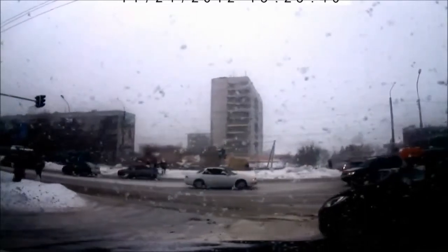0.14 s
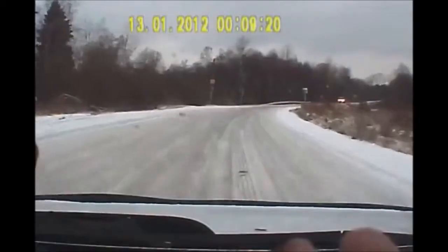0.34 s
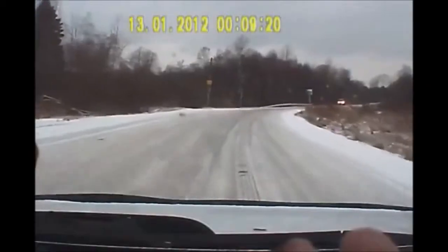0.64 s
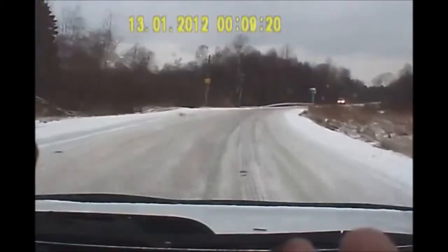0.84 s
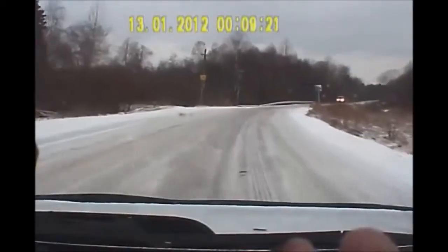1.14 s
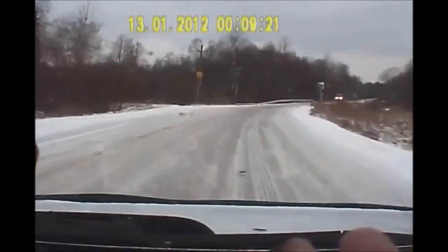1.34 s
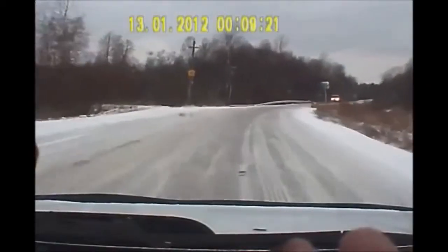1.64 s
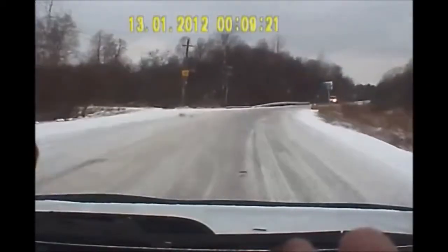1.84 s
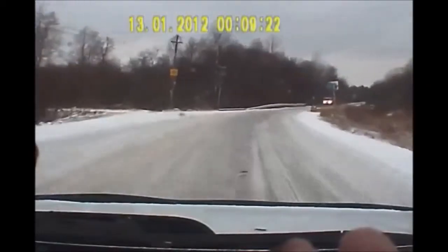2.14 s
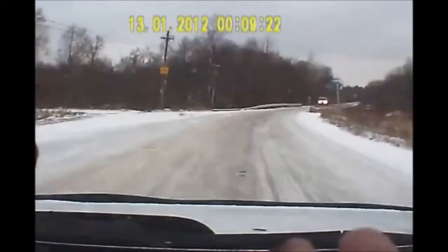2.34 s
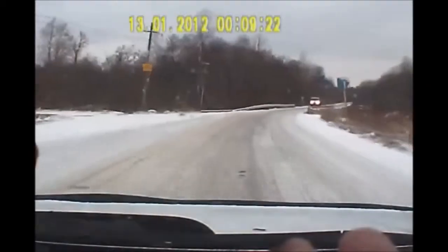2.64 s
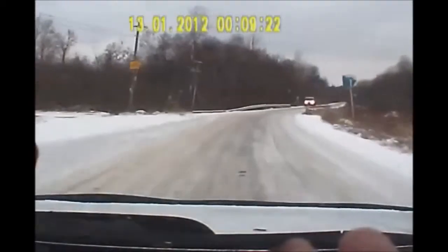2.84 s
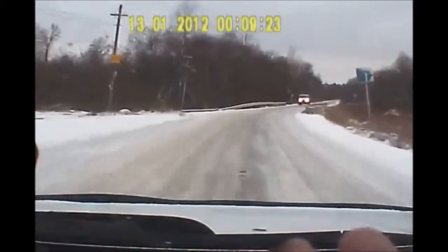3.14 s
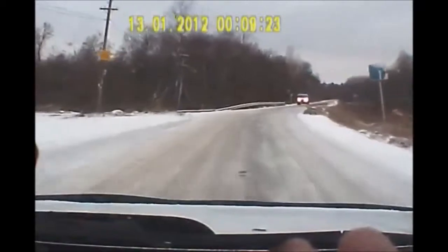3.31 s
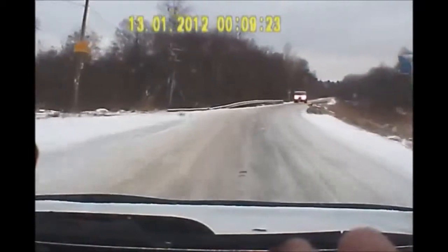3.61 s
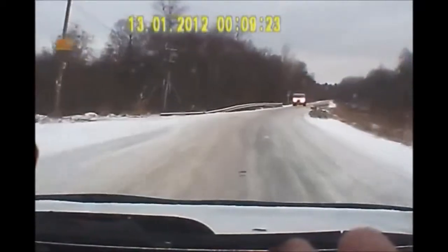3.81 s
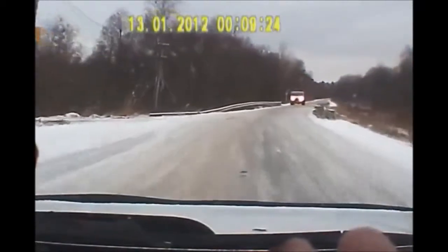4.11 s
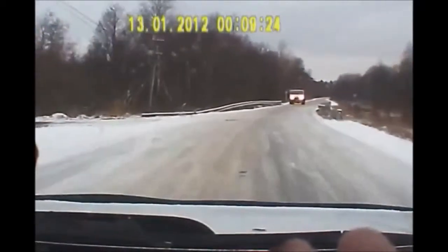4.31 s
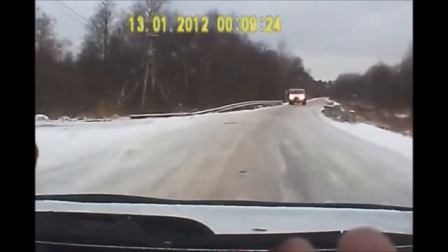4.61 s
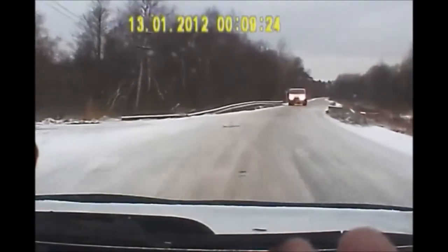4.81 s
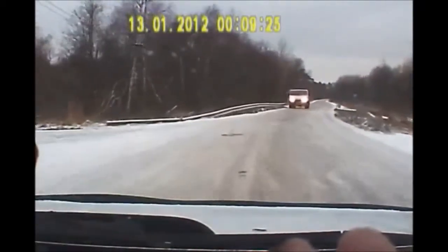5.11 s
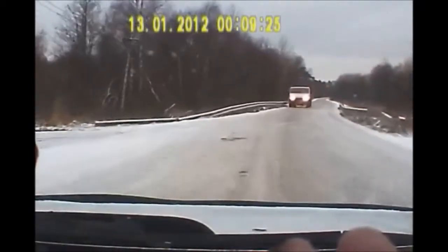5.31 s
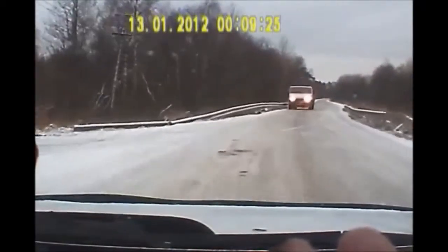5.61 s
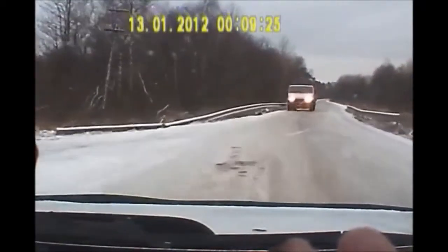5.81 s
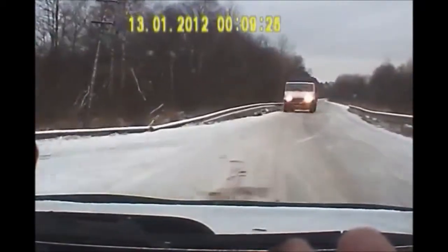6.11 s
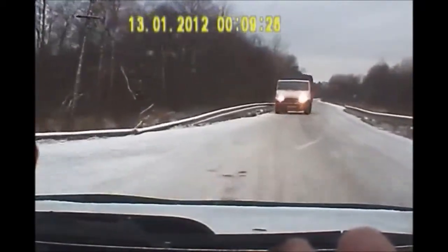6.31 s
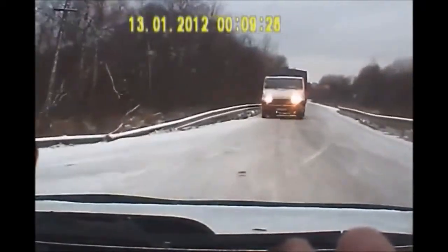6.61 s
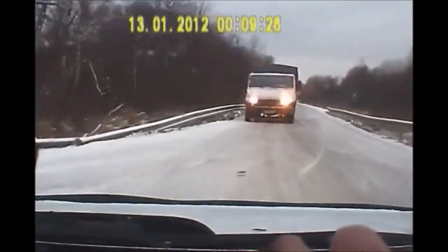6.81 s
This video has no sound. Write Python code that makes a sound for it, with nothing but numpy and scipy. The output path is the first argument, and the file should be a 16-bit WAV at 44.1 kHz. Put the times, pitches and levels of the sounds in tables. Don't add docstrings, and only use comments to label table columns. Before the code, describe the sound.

A cheap dashboard microphone in a closed cabin. First a short, muffled idle rumble with deep wobbles, then an abrupt change to a hissier drive over snow. Low tyre roar and body rumble stay fairly even, with plastic ticks early on. Rutted ice then brings a sudden rougher, louder roar, juddering panels, rattling mount, crunching slush and heavy low bumps. The roar later drops, but sharp snaps and a hard panel thump follow.

```python
import sys
import numpy as np
from scipy import signal
from scipy.fft import rfft, irfft
from scipy.io import wavfile

SR = 44100
rng = np.random.default_rng(int(sys.argv[2]) if len(sys.argv) > 2 else 0)


def dump(signal):
    limited = np.clip(np.atleast_2d(signal).T, -1, 1)
    pcm = np.round(limited * 32767).astype(np.int16)
    wavfile.write(sys.argv[1], SR, pcm)


def gain_from_decibels(decibels):
    exponent = np.asarray(decibels, float) / 20
    return 10 ** exponent


N = 306495
CUT_S = 0.38150

# f/Hz, level per Hz/dB
TOWN_COLOUR = [(120, -42), (200, -1.5), (284, 0.5), (508, -14.5), (822, -14), (1680, -34), (2210, -33),
               (2410, -30), (3090, -40.5), (6500, -50), (8450, -76), (14300, -120)]
# f/Hz, level per Hz/dB
IDLE_COLOUR = [(50, -24), (65, -1), (90, -1), (140, -4), (200, -15), (240, -36)]
# f/Hz, level/dB
TOWN_WHINE = [(7870, -69)]
# t/s, level/dB, f/Hz, half length/s
TOWN_LURCHES = [
    (0.02, -27.5, 85.5, 0.021),
    (0.115, -25, 95, 0.0075),
    (0.122, -56, 1700, .002),
    (0.15, -20.5, 50.4, 0.011),
    (0.186, -27, 40.3, 0.018),
    (0.358, -29.5, 51, 0.023),
    (0.375, -27, 40, 0.0051),
]
TOWN_CABIN_DB, TOWN_HEAVE_DB, TOWN_IDLE_DB, TOWN_HISS_DB = -41, -31.5, -30, -66
IDLE_FADE_DB_PER_S = 43

# f/Hz, level per Hz/dB
HISS_COLOUR = [(1410, -24), (2400, -12), (3060, -5), (3600, 0), (4280, -2), (5930, -1.5), (6520, 0),
               (8050, -4.5), (8240, -2.5), (9330, -2), (12500, -11), (13900, -28), (15500, -54)]
# f/Hz, level/dB, time to fall 60 dB/s
MIC_RESONANCE = (9230, -62, 0.017)
# f/Hz, level/dB
MIC_WHINE = [(8441, -64), (12000, -80)]
HISS_DB, MIC_TOP_HZ = -52.5, 12500
OFFSET, RAIL = -0.62, -0.99

# t/s, roar level/dB
ROAD = [(0.45, -31), (2.05, -33), (3.12, -33.5), (3.33, -33), (3.37, -27.5), (3.56, -27), (3.79, -29),
        (3.99, -25), (4.51, -23), (4.77, -25), (5.55, -24), (5.87, -25), (6.21, -30.5), (6.92, -33)]
# t/s, share of ice/0-1
ROUGHNESS = [
    (0.4, 0.03),
    (3.2, 0.01),
    (3.34, 0.55),
    (3.362, 1),
    (5.8, 0.38),
    (6.3, 0.54),
    (6.95, 0.56),
]
ROAD_MEAN_DB = -30
HEAVE_FOLLOWS, BODY_FOLLOWS, BOOM_FOLLOWS, HUM_FOLLOWS, RUSTLE_FOLLOWS = 0.13, 0.29, 0.04, -0.21, 0.5

# f/Hz, level per Hz/dB
HEAVE_COLOUR = [(14, -32), (24, 1.5), (36, -1), (44, -1), (53, 1), (62, -10), (70, -47)]
# f/Hz, level per Hz/dB
BODY_COLOUR = [(55, -6), (66, -3), (76, 3.5), (100, -3), (120, -4), (142, -4), (160, -14.5), (200, -6.5),
               (240, -28)]
# f/Hz, width/Hz, level/dB
BOOM_MODES = [(258.2, 36, -3), (301.6, 40.8, 2), (367, 40, -2.5), (437.3, 45, -4.5)]
# f/Hz, width/Hz, level/dB
ENGINE_HUM = [(138.7, 15.4, 0)]
# t/s, level/dB, f/Hz, half length/s
RUTS = [(0.6, -25, 41, 0.023), (0.74, -23, 43, 0.036), (1.09, -25, 46.3, 0.022), (1.42, -24, 45, 0.033),
        (2.19, -31, 43, .03), (2.65, -28, 39, .03), (3.68, -21, 43, 0.027), (3.78, -19, 40, 0.024),
        (3.87, -26, 45, .03), (4.08, -19.5, 34.8, .03), (4.2, -37, 42, .03), (4.49, -15.5, 43, 0.021),
        (4.58, -15.5, 35.8, 0.028), (4.9, -26, 45, .03), (5.31, -19.5, 45, 0.035), (5.7, -20.5, 45, 0.026),
        (5.79, -17.5, 42.2, 0.022), (6.05, -15.5, 40.8, 0.027), (6.22, -19.5, 38.3, 0.06),
        (6.45, -24, 37, 0.037), (6.62, -17.5, 38.8, 0.039), (6.93, -21, 43.8, 0.027)]
# t/s, level/dB, half length/s
WASHBOARD = [(0.492, -36.5, 0.043), (3.886, -42.5, 0.13), (4.107, -34, 0.037), (4.37, -27, 0.025),
             (4.57, -28, 0.028), (5.017, -40, 0.19), (5.215, -34, 0.018), (5.437, -31, 0.12),
             (5.735, -35, .04), (5.996, -30, 0.021), (6.238, -31.5, 0.038), (6.78, -30, 0.024)]
# t/s, level/dB, f/Hz, half length/s
SHUDDERS = [
    (6.654, -19, 1900, 0.0013),
    (6.745, -27.5, 400, .01),
    (6.76, -23.5, 229, .012),
    (6.79, -19.5, 340, .012),
    (6.867, -18, 693, 0.0021),
]
# t/s, level/dB, f/Hz, half length/s
JOLTS = [
    (3.363, -26, 90, 0.022),
    (3.94, -27, 107, .02),
    (5.67, -27, 98, .02),
    (5.999, -24, 92, 0.022),
    (6.149, -28, 96, .03),
    (6.34, -25, 85, 0.023),
    (6.509, -27.5, 87, 0.018),
    (6.74, -25, 84, 0.018),
    (6.812, -22.5, 79, 0.027),
]
HEAVE_DB, BODY_DB, BOOM_DB, HUM_DB = -27, -32, -28.5, -38

# f/Hz, level per Hz/dB
RATTLE_COLOUR = [(1900, -11), (2300, -13.5), (2930, -9.5), (3400, -2), (3640, -0.5), (3900, -5),
                 (4400, -9.5), (4900, -12), (5600, -45)]
# f/Hz, level per Hz/dB
CRUNCH_COLOUR = [(4200, -30), (4900, -7.5), (5900, 2), (6700, -7), (7600, -36)]
# f/Hz, level per Hz/dB
SPRAY_COLOUR = [(5200, -22), (6500, -2.5), (8700, 2), (10700, -1.5), (13000, -13), (14500, -29)]
# f/Hz, level/dB, time to fall 60 dB/s
MOUNT_TONES = [(3500, -7, 0.0086), (3647, 14, 0.037), (3610, 5, 0.014), (4800, -2, .01),
               (5700, -29, 0.0085)]
# t/s, rattle level/dB, half length/s, slush over rattle/dB
BURSTS = [(4.003, -62, 0.05, -7), (4.095, -35, .01, -14), (4.155, -55, 0.061, -11), (4.342, -49, 0.021, -3),
          (4.566, -44, 0.028, -25), (5.103, -45.5, .05, -9), (5.162, -39.5, 0.016, -18),
          (5.243, -43, .03, 3.5), (5.335, -46, 0.03, -11), (5.415, -52, .03, 0), (5.55, -50, .12, -9),
          (5.846, -51.5, 0.052, -5), (5.998, -33.5, 0.011, -5), (6.04, -42.5, 0.028, -8),
          (6.23, -48.5, 0.055, -5), (6.42, -41, .03, -7), (6.637, -35, 0.018, -1), (6.712, -44, .03, 2.5),
          (6.87, -45.5, 0.02, -6)]
RATTLE_DB, CRUNCH_DB, SPRAY_DB = -53.5, -66, -64.5
SPRAY_UNDER_CRUNCH_DB = 3.5

# f/Hz, level/dB, time to fall 60 dB/s
TRIM_TONES = [(4280, 17, 0.018), (3540, 8, 0.053)]
# lowest f/Hz, highest f/Hz
TICK_BANDS = [(1100, 1825), (5500, 9500)]
# t/s, peak level/dB, low knock/dB, bright edge/dB, ring/dB
SNOW_TICKS = [(0.482, -40, -9, -15, -9), (0.516, -38, -9, -15, -9), (0.5266, -26.5, 2, -15, 4.5),
              (0.6789, -46, 0, -11, -9), (0.745, -38, 7, -8, -9), (0.7952, -30.5, 9, -22, 5),
              (0.94, -37, 0, -13, -9), (1.0216, -24.5, 0, -25, -3), (1.1325, -22.5, 0.5, -26, -12),
              (1.183, -29, 5, -11, -5), (1.2046, -19.5, 4.5, 1, -2), (1.451, -37, 2, -15, -12),
              (1.477, -38, 3, -12, -11)]
# t/s, peak level/dB, low knock/dB, bright edge/dB
ICE_TICKS = [(3.3525, -40, 1, -14), (3.3732, -22, -2, -15), (3.8226, -32, 7, -20), (3.96, -20.5, -4, -23),
             (3.9842, -20, 0, -15), (4.013, -19.5, 3, -8), (4.033, -28, 9, -12), (4.06, -21.5, 1, -1.5),
             (4.0823, -15.5, -5, -38), (4.106, -26.5, -4, 7.5), (4.1112, -15.5, -1, -19),
             (4.1585, -20.5, -14, -8), (4.231, -25, 1, -17), (4.4725, -28, -1, -19),
             (4.5537, -19, 1.5, -15), (4.812, -28.5, 3, -20), (4.887, -32, -3, -17), (5.1519, -31, 6, -23),
             (5.3305, -31, 10, 0), (5.9882, -18, -10, -9), (6.0242, -24, 7, -8), (6.2425, -33, 9.5, -16),
             (6.399, -34, -7, -18), (6.6144, -32, -13, -16), (6.651, -14.5, 4, -10), (6.7696, -28, -3, -18),
             (6.863, -21, 1.5, -21)]
# t/s, peak level/dB, low knock/dB, bright edge/dB
SNAPS = [
    (4.3182, -28, -6, -19),
    (5.983, -24, -1, -15),
    (6.0796, -36, -9, -18),
    (6.5922, -13.5, -17, -37),
    (6.633, -27, -2, -16),
]
# t/s, peak level/dB, f/Hz, time to fall 60 dB/s
THUMPS = [
    (1.204, -32, 1700, 0.014),
    (6.021, -16, 520, .03),
    (6.023, -28.5, 9200, 0.066),
    (6.654, -12, 880, 0.029),
]
TICK_HZ, SNAP_HZ, ICE_RING_DB = 3840, 4960, -20

# f/Hz, level per Hz/dB
SNOW_ROAR_COLOUR = [(280, 4), (480, -10.5), (536, -5), (590, 0), (747, -1.5), (799, -0.5), (1260, -10),
                    (1850, -25.5), (2800, -32.5), (3640, -32), (6160, -120)]
# f/Hz, level per Hz/dB
ICE_ROAR_COLOUR = [(280, 2.5), (480, -12), (669, -12), (731, -2.5), (989, -1), (1260, -2.5), (1450, -9),
                   (1730, -14), (2800, -27.5), (3640, -37), (6160, -120)]
# f/Hz, width/Hz, level/dB
FLOOR_PANELS = [(659.6, 61, -11.5), (888.4, 42, -1), (995.4, 23, 2.5), (1108, 66, 2), (1254, 17, -4.5),
                (1534, 62, -16), (1711, 33, -9.5)]
# f/Hz, level per Hz/dB
SCRUB_COLOUR = [(1200, -17), (1700, 2), (2300, -5), (3000, -20)]
SCRUB_S, SCRUB_DB, SCRUB_HALF_S = 3.55, -43, 0.076


def seconds():
    return np.arange(N) / SR


def rms_one(x):
    return x / np.sqrt(np.mean(x ** 2) + 1e-20)


def peak_one(x):
    return x / np.abs(x).max()


def in_time(rows):
    s, *columns = np.transpose(rows)
    return [np.interp(seconds(), s, column) for column in columns]


def drift(rate):
    r = np.exp(-80 * np.pi * rate / SR)
    noise = rng.standard_normal(N // 40 + 2002)
    slow = signal.lfilter([1], [1, -2 * r, r * r], noise)[2000:]
    return np.interp(np.arange(N) / 40, np.arange(len(slow)), np.clip(rms_one(slow), -2, 2))


def coloured(colour):
    hz, db = np.transpose(colour)
    f = np.maximum(np.arange(N // 2 + 1) * SR / N, 1)
    shape = gain_from_decibels(np.interp(np.log(f), np.log(hz), db, left=-120, right=-120))
    return rms_one(irfft(rfft(rng.standard_normal(N)) * shape, N))


def ring(drive, hz, t60):
    r = gain_from_decibels(-60 / (max(t60, 0.002) * SR))
    w = 2 * np.pi * hz / SR
    return signal.lfilter([0, np.sin(w)], [1, -2 * r * np.cos(w), r * r], drive + 1e-18)


def resonant(modes, flicker_db):
    out = 0
    for hz, width, db in modes:
        t60 = np.log(1000) / (np.pi * 1.5 * width)
        once = ring(rng.standard_normal(N), hz, t60)
        out = out + gain_from_decibels(db + flicker_db * drift(7.6)) * rms_one(ring(once, hz, t60))
    return rms_one(out)


def swell(s, half_s):
    return np.exp(-0.5 * ((seconds() - s) / half_s) ** 2)


def rocking(rows):
    out = 0
    for s, db, hz, half_s in rows:
        swing = np.sin(2 * np.pi * hz * (seconds() - s))
        out = out + np.sqrt(2) * gain_from_decibels(db) * swell(s, half_s) * swing
    return out


def whine(lines):
    return sum(np.sqrt(2) * gain_from_decibels(db) * np.sin(2 * np.pi * hz * seconds()) for hz, db in lines)


def town():
    idle_db = TOWN_IDLE_DB - IDLE_FADE_DB_PER_S * np.minimum(seconds(), CUT_S)
    air = gain_from_decibels(TOWN_CABIN_DB) * coloured(TOWN_COLOUR)
    heave = gain_from_decibels(TOWN_HEAVE_DB) * coloured(HEAVE_COLOUR)
    engine = gain_from_decibels(idle_db) * coloured(IDLE_COLOUR)
    hiss = gain_from_decibels(TOWN_HISS_DB) * rng.standard_normal(N)
    return air + heave + engine + rocking(TOWN_LURCHES) + whine(TOWN_WHINE) + hiss


def microphone_noise():
    hz, db, t60 = MIC_RESONANCE
    peak = gain_from_decibels(db) * rms_one(ring(rng.standard_normal(N), hz, t60))
    return gain_from_decibels(HISS_DB) * coloured(HISS_COLOUR) + peak + whine(MIC_WHINE)


def cabin(swing_db):
    heave = gain_from_decibels(HEAVE_DB + HEAVE_FOLLOWS * swing_db) * coloured(HEAVE_COLOUR)
    body = gain_from_decibels(BODY_DB + BODY_FOLLOWS * swing_db) * coloured(BODY_COLOUR)
    washboard = sum(gain_from_decibels(db) * swell(s, half_s) for s, db, half_s in WASHBOARD)
    boom_height = gain_from_decibels(BOOM_DB + BOOM_FOLLOWS * swing_db) + washboard
    boom = boom_height * resonant(BOOM_MODES, flicker_db=2.0)
    hum = gain_from_decibels(HUM_DB + HUM_FOLLOWS * swing_db) * resonant(ENGINE_HUM, flicker_db=3.5)
    return heave + rocking(RUTS) + rocking(SHUDDERS + JOLTS) + hum + body + boom


def mount_rattle(ice):
    sizes = gain_from_decibels(5.3 * np.minimum(rng.exponential(1, N), 4)) * rng.choice([-1, 1], N)
    knocks_per_s = (30 + 500 * ice) * gain_from_decibels(5 * drift(6))
    clicks = sizes * (rng.random(N) < knocks_per_s / SR)
    return rms_one(sum(gain_from_decibels(db) * ring(clicks, hz, t60) for hz, db, t60 in MOUNT_TONES))


def rustle(ice, swing_db):
    bed = gain_from_decibels(RUSTLE_FOLLOWS * swing_db)
    chatter = sum(gain_from_decibels(db) * swell(s, half_s) for s, db, half_s, _ in BURSTS)
    splash = sum(gain_from_decibels(db + slush_db) * swell(s, half_s) for s, db, half_s, slush_db in BURSTS)
    rattle = (gain_from_decibels(RATTLE_DB) * bed + chatter) * (coloured(RATTLE_COLOUR) + 0.25 * mount_rattle(ice))
    crunch = (gain_from_decibels(CRUNCH_DB) * bed + splash) * coloured(CRUNCH_COLOUR)
    spray_height = gain_from_decibels(SPRAY_DB) * bed + gain_from_decibels(-SPRAY_UNDER_CRUNCH_DB) * splash
    spray = spray_height * coloured(SPRAY_COLOUR)
    grain_db = 2.2 * drift(27) - 14 * (1 - ice) ** 2
    return gain_from_decibels(grain_db) * (rattle + crunch + spray)


def ticks():
    out, t = np.zeros(N), np.arange(2500) / SR
    rows = [(*row, TICK_HZ) for row in SNOW_TICKS]
    rows += [(*row, ICE_RING_DB, TICK_HZ) for row in ICE_TICKS]
    rows += [(*row, ICE_RING_DB, SNAP_HZ) for row in SNAPS]
    low_band, high_band = [signal.butter(3, edges, "band", fs=SR, output="sos") for edges in TICK_BANDS]
    envelope = t * (np.exp(-t / 0.0012) + 0.018 * np.exp(-t / 0.0058))
    for s, db, low_db, bright_db, ring_db, hz in rows:
        scrape = rng.standard_normal(len(t)) * envelope
        mid_band = signal.butter(2, [hz / 1.48, hz * 1.416], "band", fs=SR, output="sos")
        low, high, mid = [peak_one(signal.sosfilt(band, scrape)) for band in (low_band, high_band, mid_band)]
        trim = peak_one(sum(gain_from_decibels(g) * ring(scrape, f, t60) for f, g, t60 in TRIM_TONES))
        tick = gain_from_decibels(low_db) * low + mid + gain_from_decibels(bright_db) * high + gain_from_decibels(ring_db - 6.5) * trim
        i = round(s * SR)
        out[i:i + len(t)] += gain_from_decibels(db - 1.0) * tick[:N - i]
    return signal.sosfilt(signal.butter(6, MIC_TOP_HZ, fs=SR, output="sos"), out)


def thumps():
    out = 0
    for s, db, hz, t60 in THUMPS:
        t = np.maximum(seconds() - s, 0)
        ease_in = np.minimum(t / 0.00095, 1)
        out = out + gain_from_decibels(db - 60 * t / t60) * np.sin(2 * np.pi * hz * t) * ease_in
    return out


def scrub():
    return gain_from_decibels(SCRUB_DB) * swell(SCRUB_S, SCRUB_HALF_S) * coloured(SCRUB_COLOUR)


def tyres(ice):
    roar = np.sqrt(1 - ice) * coloured(SNOW_ROAR_COLOUR) + np.sqrt(ice) * coloured(ICE_ROAR_COLOUR)
    panels = (0.21 + 0.56 * ice) * resonant(FLOOR_PANELS, flicker_db=3.5)
    judder_db = (1.02 + 0.17 * ice) * drift(13.4)
    return gain_from_decibels(in_time(ROAD)[0]) * (0.96 * roar + panels) * gain_from_decibels(judder_db)


def scene():
    ice = np.clip(in_time(ROUGHNESS)[0], 0, 1)
    swing_db = in_time(ROAD)[0] - ROAD_MEAN_DB
    steady_rattle = gain_from_decibels(-73) * mount_rattle(0.1)
    drive = microphone_noise() + cabin(swing_db) + steady_rattle + rustle(ice, swing_db)
    drive = drive + ticks() + thumps() + scrub() + tyres(ice)
    return np.where(np.arange(N) < CUT_S * SR, town(), drive)[None]


def low_pass(x):
    return signal.sosfilt(signal.butter(12, 15760, fs=SR, output="sos"), x)


def record(dry):
    shifted = dry + OFFSET * (np.arange(N) >= CUT_S * SR)
    return low_pass(np.maximum(shifted, RAIL))


dry = scene()
out = record(dry)
dump(out)
```